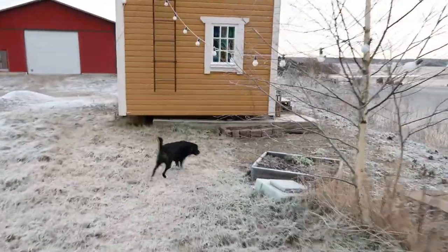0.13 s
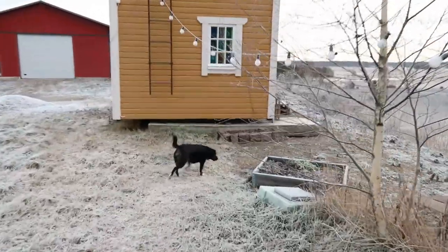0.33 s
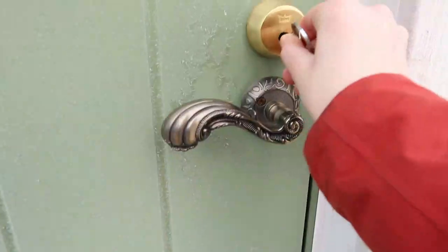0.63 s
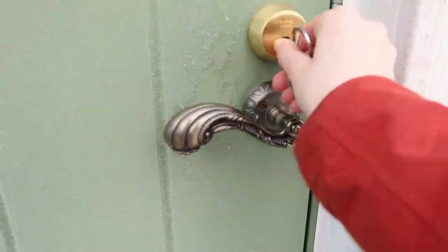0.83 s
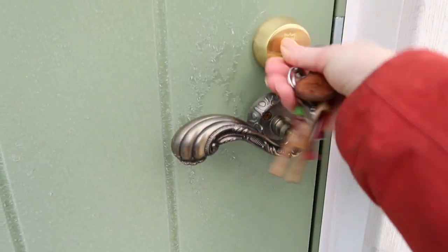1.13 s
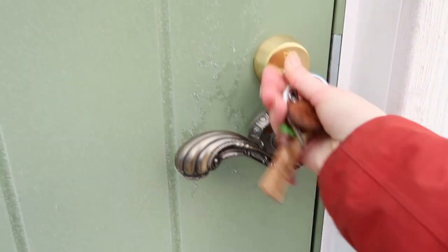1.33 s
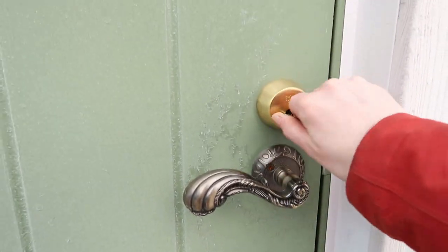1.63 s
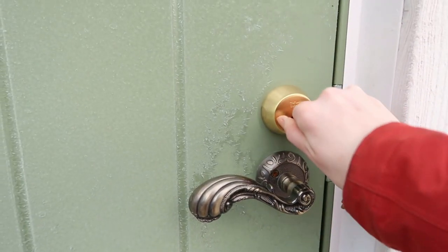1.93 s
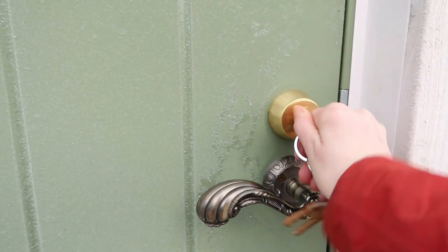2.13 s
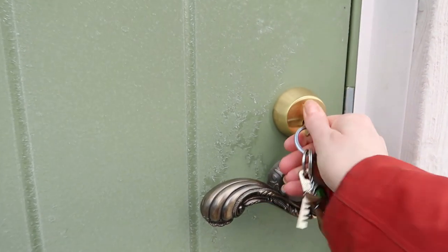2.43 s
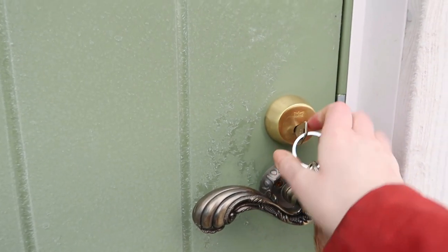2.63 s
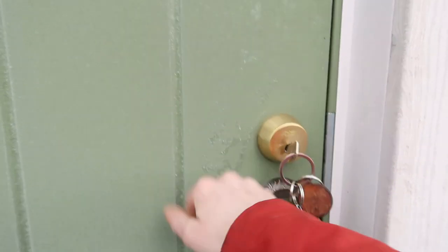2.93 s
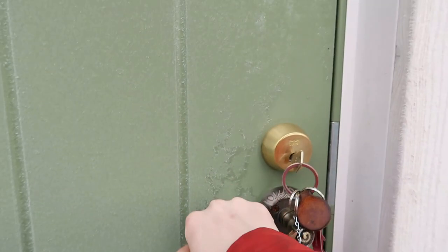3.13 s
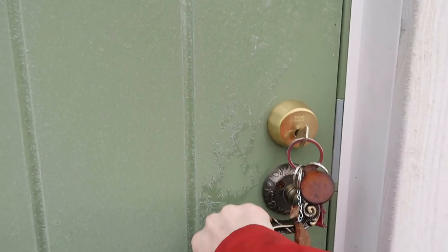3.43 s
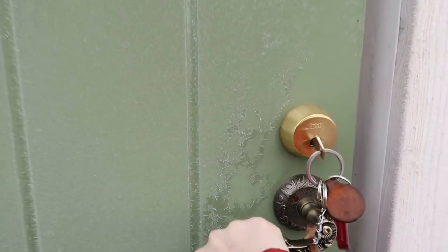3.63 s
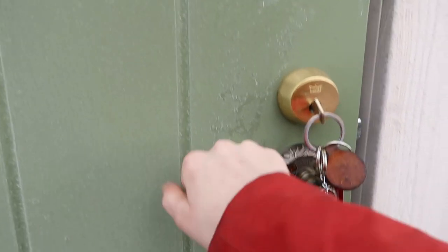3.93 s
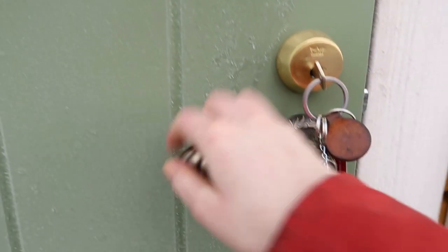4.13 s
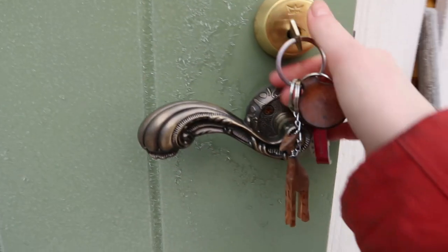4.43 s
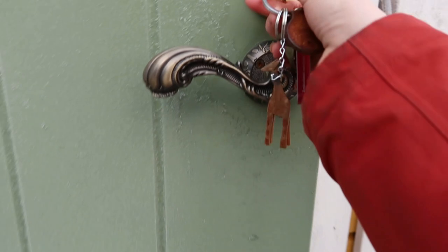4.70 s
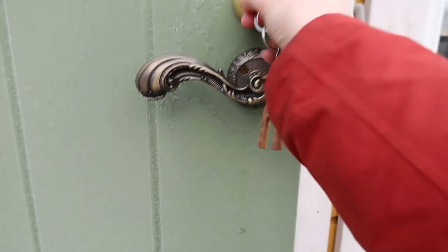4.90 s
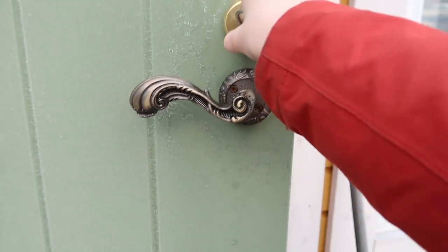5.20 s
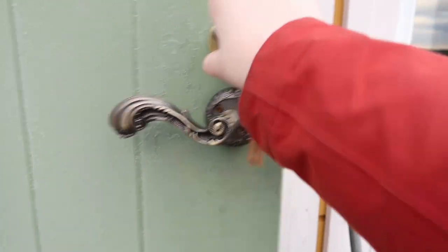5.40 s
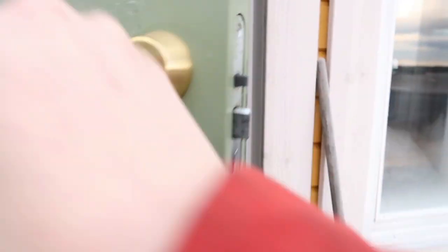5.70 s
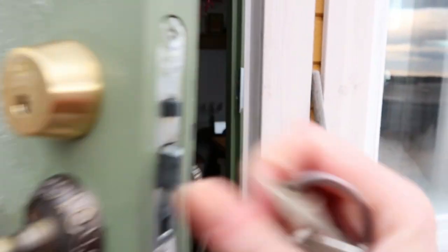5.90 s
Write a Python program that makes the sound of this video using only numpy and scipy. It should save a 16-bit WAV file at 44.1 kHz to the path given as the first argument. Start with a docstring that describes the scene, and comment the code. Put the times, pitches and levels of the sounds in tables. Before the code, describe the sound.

The sound is close, picked up by a hand-held microphone outdoors in still, faintly hissing air. A soft step lands at about 0.3 seconds. From 0.6 to 1.2 seconds a key clicks in a lock, with hollow knocks from the wooden door. Keys jingle lightly around 1.5 to 1.9 seconds, then the lock turns with sharp metal clacks between 2.1 and 2.3. A brighter jingle and more clicks come near 2.9. From 3.2 seconds the handle is pressed, and the door thuds and shudders, loudest around 3.6, with another sharp click at 3.9. Between 4.5 and 5 seconds the key turns again amid jingling, clicks and knocks. The door is pulled open with a thud and a latch clack from 5.5 to 5.7, and the keys give a small clink at 6. Soft sleeve rubbing and low handling rumble come and go throughout.

```python
"""A frosty morning outdoors, close to a hand-held camera. A step crunches, then a hand works a key in
the lock of a wooden door: metal contacts click and the key ring jingles. The hand presses the handle,
and the panel thuds and shudders. The key turns again and the door is pulled open. Throughout, sleeve
and parts rub, the grip rumbles and still air hisses, all heard through two close microphone ports."""
import sys
import numpy as np
from scipy.fft import rfft, irfft, next_fast_len
from scipy.io import wavfile
from scipy.ndimage import map_coordinates

SR = 44100
rng = np.random.default_rng(int(sys.argv[2]) if len(sys.argv) > 2 else 0)


def store_pcm(level_fs):
    """Save levels as 16-bit WAV."""
    pcm = np.round(np.clip(level_fs, -1, 1) * 32767).astype(np.int16)
    wavfile.write(sys.argv[1], SR, np.atleast_2d(pcm).T)


N = 267025

# Metal contacts in lock and handle: start_s, level_db, pitch_hz, brightness_db
LOCK_CLICKS = [(0.328, -30.5, 1320, -10.5), (0.591, -39, 1350, -28), (0.605, -27, 1830, -14.5),
               (0.84, -20.5, 1530, -8.5), (.849, -18, 1710, -13), (0.8973, -33, 2660, -7.5),
               (0.94, -23, 1520, -7), (0.9568, -26.5, 1850, -6), (1.174, -31, 1800, -26),
               (1.21, -27, 1470, -12), (1.584, -30, 5100, -22), (2.0533, -29, 1620, -26.5),
               (2.116, -28.5, 1670, -21), (2.135, -11, 1780, -17), (2.149, -9, 1860, -15),
               (2.188, -13.5, 1750, -20.5), (2.2048, -14, 1700, -25), (2.226, -26.5, 1790, -13.5),
               (2.2808, -23, 1740, -11), (2.297, -9, 1770, -9.5), (2.5914, -30, 1780, -17),
               (2.667, -29, 4800, -1.5), (2.725, -28.5, 3950, -10), (2.8, -21, 2620, -19),
               (2.842, -30, 2690, -12), (2.853, -22.5, 2500, -9), (2.9017, -11.5, 3800, -22),
               (2.9243, -11, 2840, -19), (3.0036, -27.5, 4800, -12.5), (3.2079, -12.5, 1780, -24),
               (3.3215, -17.5, 1930, -21), (3.491, -18.5, 1610, -13.5), (3.556, -19, 2070, -23),
               (3.601, -17.5, 1690, -25), (3.642, -16, 3020, 2.5), (3.8691, -10, 1950, -23),
               (4.024, -33, 1710, -11.5), (4.5455, -26.5, 2520, -22), (4.604, -22, 2550, -28),
               (4.6262, -22, 4470, -5), (4.6495, -21.5, 2550, -26), (4.887, -17.5, 2200, -11),
               (4.8917, -19, 2170, -13.5), (5.487, -31, 1910, -44), (5.66, -26, 1530, -14),
               (5.692, -8.5, 1460, -22), (5.831, -26.5, 1340, -18.5)]
# Lock case modes: freq_hz, width_hz, level_db
CASE_MODES = [(1298, 740, 12), (1805, 930, 12.5), (2115, 280, 14.5), (2520, 460, 13), (2960, 1600, 8.5),
              (4000, 940, -2.5), (4480, 390, -3), (5000, 1460, -5)]
# Modes of the cylinder's small steel parts: freq_hz, width_hz, level_db
PIN_MODES = [(5270, 830, -2), (6650, 140, 9), (7990, 450, -1.5)]
# Treble of a metal contact: freq_hz, density_db
CONTACT_SPECTRUM = [(3000, -0.5), (5500, 2.5), (9000, 0), (13000, -2), (14500, -27), (16000, -39)]
RATTLE_DB, SNAP_DB, RING_DB = -9.5, 2.5, -4.5
RATTLE_T60_S, SNAP_T60_S, RING_T60_S = 0.068, 0.033, 0.04828

def lock():
    """Each contact snaps in the pins, rattles the case and rings the modes near its pitch."""
    starts_s, levels_db, pitches_hz, bright_db = np.transpose(LOCK_CLICKS)
    mode_hz, _, mode_db = np.transpose(CASE_MODES)
    chatter = amp(1.4 * np.clip(wobble(490), -3, 1.5))  # parts bounce as they seat
    case_force = bursts(starts_s, levels_db + RATTLE_DB, RATTLE_T60_S, rise_s=0.0022)
    rattle = filtered(chatter * case_force, resonances(CASE_MODES))
    pin_force = bursts(starts_s, levels_db + bright_db + SNAP_DB, SNAP_T60_S, rise_s=0.0007)
    pins = lambda hz: colour(CONTACT_SPECTRUM)(hz) + 0.41 * resonances(PIN_MODES)(hz)
    snap = filtered(chatter * pin_force, pins)
    tones, t = np.zeros(N), np.arange(SR // 5) / SR
    detunes = rng.normal(1, .015, (len(starts_s), len(mode_hz)))
    for start_s, level_db, pitch_hz, detune in zip(starts_s, levels_db, pitches_hz, detunes):
        struck_db = mode_db + falloff_db(mode_hz, pitch_hz, db_per_octave=54)
        struck = ring(mode_hz * detune, struck_db, RING_T60_S, t, scatter_db=4)
        add_at(tones, start_s, amp(level_db + RING_DB) * struck * attack(t, 0.0014))
    roughness = unit_rms(1 + .5 * wobble(350))  # loose parts smear the ringing
    return rattle + roughness * tones + snap


# Door knocks and low thumps of handling or steps:
# start_s, level_db, pitch_hz, boom_re_level_db, hardness_db
THUDS = [(0.273, -28, 173, 7, -36), (0.431, -36.5, 172, 10.5, -11), (0.588, -26.5, 222, 1, 0.5),
         (.603, -18.5, 275, -1, -1.5), (.833, -16.5, 233, -2, -8.5), (.847, -10.5, 274, -6, -6.5),
         (.937, -14, 220, -4, -5), (.959, -17.5, 377, 0, -15.5), (1.448, -27, 183, 3.5, -11.5),
         (1.523, -41.5, 172, 17, 3), (1.57, -38, 172, 10.5, -2.5), (1.675, -31.5, 210, 6, -4.5),
         (2.052, -26, 323, -12, -10), (2.162, -30, 385, 7, 1), (2.296, -24.5, 334, -3.5, 6),
         (2.623, -30, 266, -14, -8), (2.804, -19, 546, -37, -12.5), (2.822, -24.5, 520, -27, -12),
         (2.853, -21.5, 541, -28, -34), (2.876, -28, 520, -31, -14), (2.903, -20, 538, -22, -8),
         (2.925, -21, 507, -20, -10), (3.158, -34, 400, -20, -6), (3.175, -17, 237, -10, -18),
         (3.213, -15.5, 232, -6, -19), (3.47, -23.5, 279, -6, -16), (3.492, -15.5, 392, -33, -12),
         (3.567, -8, 313, -0.5, -17), (3.602, -9, 334, -9, -15), (3.619, -10, 467, -17, -7.5),
         (3.632, -12, 430, -3.5, -10.5), (3.772, -19.5, 172, -0.5, -34), (3.807, -27.5, 174, -5, -20),
         (3.868, -26.5, 440, -1.5, 1.5), (4.027, -23.5, 273, -13.5, -17), (4.189, -29, 366, -15, -24),
         (4.602, -19.5, 337, -5.5, -42), (4.636, -15.5, 395, -12.5, -17), (4.668, -23, 426, -12, -16),
         (4.698, -24, 415, -12, -27), (4.747, -30, 404, -6, -19), (4.792, -25, 430, -34, -34),
         (4.891, -26, 500, -32, -0.5), (5.455, -29.5, 295, -36, -39), (5.486, -18, 266, -28, -20),
         (5.493, -11, 261, -27, -22.5), (5.54, -21, 248, -18.5, -49), (5.66, -23.5, 396, 0, 4),
         (5.675, -15.5, 280, -6, -4.5), (5.692, -20, 276, -11.5, -5), (5.735, -22.5, 414, -1, -32)]
# Panel modes: freq_hz, width_hz, level_db
PANEL_MODES = [(201.7, 17.4, -5), (254.6, 17, -2.5), (313.6, 30, 1), (369.8, 50, 1), (426.7, 68, -1),
               (507.8, 76, -2)]
# Modes of the whole leaf: freq_hz, level_db
LEAF_MODES = [(66, 1.5), (120, 3)]
# Stile modes: freq_hz, width_hz, level_db
STILE_MODES = [(588, 154, 8), (752, 126, 12), (993, 73, 11), (1236, 55, 6), (1554, 330, -1.5)]
SOFT_PANEL_T60_S, LEAF_T60_S, STILE_T60_S = 0.17, 0.23, 0.13

def thuds():
    """Door knocks and thumps of handling or steps share the door's modes; hard ones are shorter."""
    tones, t = np.zeros(N), np.arange(SR // 2) / SR
    panel_hz, _, panel_db = np.transpose(PANEL_MODES)
    leaf_hz, leaf_db = np.transpose(LEAF_MODES)
    stile_hz, _, stile_db = np.transpose(STILE_MODES)
    for start_s, level_db, pitch_hz, boom_db, hard_db in THUDS:
        softness = np.clip(1 - 0.01 * (hard_db + 33), .75, 1)
        struck_db = panel_db + falloff_db(panel_hz, pitch_hz, db_per_octave=25.8)
        panel = ring(panel_hz, struck_db, SOFT_PANEL_T60_S * softness, t, scatter_db=5)
        panel *= attack(t, 0.002 * softness ** 2)
        leaf = ring(leaf_hz, leaf_db, LEAF_T60_S, t, scatter_db=5) * attack(t, 0.0004)
        detune = rng.normal(1, .03, len(stile_hz))
        stile = ring(stile_hz * detune, stile_db, STILE_T60_S, t, scatter_db=4) * attack(t, 0.002)
        thud = panel + amp(boom_db) * leaf + amp(hard_db - 4.5) * stile
        add_at(tones, start_s, amp(level_db) * thud)
    starts_s, levels_db, *_, hardness_db = np.transpose(THUDS)
    rattle_force = bursts(starts_s, levels_db + hardness_db - 0.5, STILE_T60_S, rise_s=0.0019)
    return tones + filtered(rattle_force, resonances(STILE_MODES))


# Keys touching each other: start_s, level_db, place_in_bunch (0-1), tick_db
KEY_TOUCHES = [(0.601, -27, 0.82, -22), (1.5045, -44, 1, -1), (1.529, -32.5, .9, 5), (1.584, -39, .9, -14),
               (1.62, -35, 0.9, -7), (1.779, -35, 1, 0.5), (1.808, -32, 1, -16), (1.827, -18.5, 1, -27),
               (1.861, -44, 0.8, 9), (2.563, -29.5, 0.97, -24), (2.681, -24.5, 0.88, -10),
               (2.8, -15.5, 0.3, -15), (2.903, -13, 0.14, -21), (2.919, -7.5, 0.08, -28),
               (3.005, -29, .1, -9), (3.347, -38.5, .5, 16.5), (4.557, -26.5, 0.93, -5),
               (4.587, -34, .3, -12), (4.605, -20, 0.25, -21), (4.632, -14.5, 0.44, -20),
               (4.65, -21.5, 0.3, -16), (4.703, -25.5, 0.8, -9), (4.798, -26.5, 0.87, -11),
               (4.798, -24.5, 0.32, -16), (4.962, -23, 0.7, -3), (5.035, -24.5, 0.85, -16),
               (5.998, -25.5, 0.5, -3.5), (6.017, -34.5, 0.96, -1)]
# Key modes: freq_hz, level_db, free_t60_s, place_in_bunch (0-1)
KEY_MODES = [(7900, -3, .07, 0), (11350, 0, .06, 0), (14220, -5, .04, 0), (15410, -3, .1, 0),
             (6270, -8, .025, .1), (3900, -3, .025, .15), (5800, -8, .03, .15), (2570, 0, .04, .3),
             (2980, -9, .03, .3), (4440, -5, .035, .3), (7960, 0, .045, .5), (9850, -12, .03, .5),
             (11900, -2, .03, .5), (12800, -2, .03, .65), (13750, -3, .03, .75), (4800, -10, .03, .9),
             (5260, -7, .045, 1), (11950, 0, .05, 1)]
BUNCH_LOSS_DB, MUFFLE_BELOW_DB, MUFFLE_PER_DB = 80, -20, .03
LINK_DB, LINK_T60_S, TICK_T60_S = -5, .022, 0.011
SETTLE_MEAN_S, SETTLE_MEAN_DB = .015, -17

def keys():
    """A touch ticks and rings nearby keys and chain links; the bunch settles with two lighter touches."""
    tones, t = np.zeros(N), np.arange(SR // 6) / SR
    mode_hz, mode_db, free_t60_s, mode_place = np.transpose(KEY_MODES)
    for start_s, level_db, place, _ in KEY_TOUCHES:
        struck_db = mode_db - BUNCH_LOSS_DB * np.abs(mode_place - place)
        # Light touches stay in contact and ring less long.
        t60_s = free_t60_s[:, None] * np.clip(1 + MUFFLE_PER_DB * (level_db - MUFFLE_BELOW_DB), .4, 1)
        settling = [(rng.exponential(SETTLE_MEAN_S), rng.normal(SETTLE_MEAN_DB, 3)) for _ in range(2)]
        for delay_s, lighter_db in [(0, 0)] + settling:
            link_hz = np.exp(rng.uniform(np.log(2200), np.log(14500), 12))
            links = ring(link_hz, np.zeros(12), LINK_T60_S, t, scatter_db=4)
            detune = rng.normal(1, .002, len(mode_hz))
            struck = ring(mode_hz * detune, struck_db, t60_s, t, scatter_db=3)
            jingle = (struck + amp(LINK_DB) * links) * attack(t, 0.0013)
            add_at(tones, start_s + delay_s, amp(level_db + lighter_db) * jingle)
    starts_s, levels_db, _, tick_db = np.transpose(KEY_TOUCHES)
    tick_force = bursts(starts_s, levels_db + tick_db - 4.5, TICK_T60_S, rise_s=0.00082)
    ticks = filtered(tick_force, lambda hz: colour(CONTACT_SPECTRUM)(hz) * hz / 4000)
    roughness = unit_rms(1 + .55 * wobble(300))
    return roughness * tones + ticks


# Sliding strokes: peak_s, half_length_s, rasp_db, stile_re_rasp_db, fizz_re_rasp_db
STROKES = [(0.333, 0.06, -44, 6.5, -19), (0.47, 0.065, -47, -34, -15), (1.219, 0.062, -44.5, 15, -14),
           (1.288, 0.04, -43, 0, -8), (2.209, 0.042, -31.5, 2, -15), (2.863, 0.028, -41, -28, -4),
           (3.21, 0.023, -32, -2.5, -6.5), (3.342, 0.055, -31.5, -3, -17), (3.556, 0.042, -35.5, -1, -29),
           (3.651, 0.03, -25, -9, -2), (4.314, 0.036, -56.5, -40, 6.5), (4.56, 0.024, -41, -24, -7),
           (4.631, 0.056, -41, 7.5, -1), (4.967, 0.014, -50, 5, 11.5), (5.01, 0.08, -43, 3.5, -7.5),
           (5.215, 0.13, -72.5, 27.5, -37), (5.806, 0.074, -39.5, 1, -16)]
# Steady handling by sleeve, fingers and feet: time_s, rub_db, shudder_db, rumble_db
HANDLING = [(0, -48.5, -52, -74), (.3, -51, -42.5, -32.5), (.55, -55, -75, -51.5), (.95, -78, -46.5, -52),
            (1.4, -54, -46.5, -42.5), (1.85, -57, -49.5, -44), (1.97, -64, -69, -57),
            (2.248, -44.5, -35, -35), (2.5, -56, -65, -59), (2.699, -50.5, -45.5, -55.5),
            (3.44, -52.5, -40, -43.5), (3.603, -28.5, -21, -16.5), (3.75, -57.5, -43, -27.5),
            (4.05, -50, -48, -50), (4.5, -52.5, -65, -55), (4.75, -46.5, -41, -55),
            (5.4, -59.5, -51.5, -53.5), (6.05, -54, -54, -54)]
# Friction rasp: freq_hz, density_db
RASP_SPECTRUM = [(300, 9), (600, 5), (1100, 6), (1700, 6), (2600, 1), (3500, -1.5), (4500, -5),
                 (6500, -14.5), (12000, -57)]
# Friction fizz: freq_hz, density_db
FIZZ_SPECTRUM = [(3000, -12), (5000, -7), (8000, -6.5), (12500, -4), (14500, -19), (16000, -57)]
# Sleeve rustle bands: centre_hz
SLEEVE_BANDS_HZ = [1550, 2100]

def rubbing():
    """Sliding strokes rasp in lumps, the sleeve swishes smoothly, and both fizz and shake the door."""
    t = np.arange(N) / SR
    rub_gain, shudder_gain, _ = amp(curves(HANDLING))
    gains = rub_gain * amp([[-9], [-10], [-20]])  # rasp, stile, fizz
    for peak_s, half_s, rasp_db, stile_db, fizz_db in STROKES:
        swell_db = rasp_db - 20 * ((t - peak_s) / half_s) ** 2
        gains += amp(swell_db) * amp([[0], [stile_db], [fizz_db]])
    rasp_gain, stile_gain, fizz_gain = gains
    rattle = stile_gain * gritty(resonances(STILE_MODES), rate_hz=80, depth_db=3)
    sleeve = sum(gritty(resonances([(hz, 350, 0)]), rate_hz=8, depth_db=5) for hz in SLEEVE_BANDS_HZ)
    swish = rub_gain * (gritty(colour(RASP_SPECTRUM), rate_hz=30, depth_db=1.5) + .25 * sleeve)
    rasp = rasp_gain * gritty(colour(RASP_SPECTRUM), rate_hz=120, depth_db=3.5)
    fizz = fizz_gain * gritty(colour(FIZZ_SPECTRUM), rate_hz=340, depth_db=4.5)
    heavy_panel = lambda hz: resonances(PANEL_MODES)(hz) / (1 + 1j * hz / 900) ** 2  # loses treble
    shudder = shudder_gain * gritty(heavy_panel, rate_hz=40, depth_db=3.5)
    return rasp + swish + rattle + fizz + shudder


# Camera body rumble: freq_hz, density_db
RUMBLE_SPECTRUM = [(20, -11), (60, -1), (86, 2.5), (178, -5), (250, -17.5), (320, -53), (550, -120)]
# Side of the rumble: time_s, left_minus_right_db
GRIP_BALANCE = [(.4, 4), (1.0, 4), (1.6, -8), (2.1, 0)]

def grip():
    """The grip rumbles through the camera body, stronger at the nearer port."""
    *_, rumble_db = curves(HANDLING)
    side_db, = curves(GRIP_BALANCE)
    rumble = colour(RUMBLE_SPECTRUM)
    mid = gritty(rumble, rate_hz=25.04, depth_db=0.5)
    side = .3 * gritty(lambda hz: rumble(hz) * hz ** 2, rate_hz=25, depth_db=1.5)
    return amp(rumble_db) * np.array([mid + side, mid - side]) * amp([side_db / 2, -side_db / 2])


# Outdoor air and microphone hiss: freq_hz, density_db
AIR_SPECTRUM = [(25, -26), (92, 4.5), (218, 2), (381, 4.5), (518, -1), (3770, -17.5), (7900, -24),
                (11000, -33.5), (14300, -68), (22000, -120)]
AIR_DB, CODER_TONE_HZ, CODER_TONE_DB = -50.5, 13000, -84

def noise_floor():
    mid, side = filtered(rng.standard_normal((2, N)), colour(AIR_SPECTRUM))
    side = filtered(side, lambda hz: hz / (hz + 900))
    flicker = amp(CODER_TONE_DB + 3 * wobble(45))
    coder_tone = flicker * np.sin(2 * np.pi * CODER_TONE_HZ * np.arange(N) / SR + wobble(40))
    return amp(AIR_DB + 2.56 * wobble(2.58)) * np.array([mid + side, mid - side]) + coder_tone


# Phase lead of the left port: freq_hz, lead_rad
PORT_LEAD = [(25, 0), (3800, 0), (5600, -.6), (7500, -1.9), (10600, -2.2), (15000, -2.3)]
# Sound that differs between the ports: freq_hz, level_db
PORT_SCATTER = [(30, -28), (70, -18), (150, -8), (350, -18), (700, -21), (1500, -13), (3000, -9),
                (8000, -10)]

def ports(x):
    """Two ports: a phase offset grows with pitch; a randomly fluttering difference widens the sound."""
    direct = filtered(x, lambda hz: np.exp(.5j * log_interp(PORT_LEAD, hz) * np.array([[1], [-1]])))
    scattered = wobble(16) * filtered(x, lambda hz: 1j * amp(log_interp(PORT_SCATTER, hz)))
    return direct * amp([[.2], [-.2]]) + np.array([scattered, -scattered])


def ring(hz, db, t60_s, t, scatter_db):
    """Modes struck together at random strengths and polarities, peak 1."""
    polarity, strength = rng.standard_normal((2, len(hz), 1))
    envelopes = amp(db[:, None] + scatter_db * strength - 60 * t / t60_s)
    tone = (np.sign(polarity) * envelopes * np.sin(2 * np.pi * hz[:, None] * t)).sum(0)
    return tone / np.abs(tone).max()


def bursts(starts_s, levels_db, t60_s, rise_s):
    """Force of rattling contacts: one dying noise burst each."""
    force, t = np.zeros(N), np.arange(SR // 4) / SR
    envelope = amp(-60 * t / t60_s) * attack(t, rise_s)
    for start_s, level_db in zip(starts_s, levels_db):
        add_at(force, start_s, amp(level_db) * envelope * rng.standard_normal(len(t)))
    return force


def gritty(response, rate_hz, depth_db):
    """Noise in uneven lumps through a response, RMS 1."""
    lumps = amp(depth_db * np.clip(wobble(rate_hz), -3, 1.8))
    return unit_rms(filtered(lumps * rng.standard_normal(N), response))


def resonances(modes):
    """Causal response of modes of alternating polarity, unit power gain."""
    return lambda hz: unit_rms(sum(
        (-1) ** k * amp(db) * 1j * hz * width_hz / (mode_hz ** 2 - hz ** 2 + 1j * hz * width_hz)
        for k, (mode_hz, width_hz, db) in enumerate(modes)))


def colour(spectrum):
    """Zero-phase response, unit power gain."""
    return lambda hz: unit_rms(amp(log_interp(spectrum, hz)))


def filtered(x, response):
    size = next_fast_len(N + SR // 2)
    return irfft(rfft(x, size) * response(np.fft.rfftfreq(size, 1 / SR)), size)[..., :N]


def wobble(rate_hz):
    """Smooth random curve."""
    knots = rng.standard_normal(int(N * rate_hz / SR) + 4)
    return map_coordinates(knots, [np.arange(N) * rate_hz / SR])


def curves(table):
    """Columns of a timed table, interpolated per sample."""
    times_s, *columns = np.transpose(table)
    return [np.interp(np.arange(N) / SR, times_s, column) for column in columns]


def log_interp(points, hz):
    point_hz, values = np.transpose(points)
    return np.interp(np.log(hz + 1), np.log(point_hz + 1), values)


def falloff_db(hz, pitch_hz, db_per_octave):
    return -db_per_octave * np.abs(np.log2(hz / pitch_hz))


def attack(t, rise_s):
    return 1 - np.exp(-t / rise_s)


def add_at(track, start_s, sound):
    span = track[round(start_s * SR):][:len(sound)]
    span += sound[:len(span)]


def amp(db):
    return 10 ** (np.asarray(db) / 20)


def unit_rms(x):
    return x / np.sqrt(np.mean(np.abs(x) ** 2) + 1e-20)


def scene():
    return ports(rubbing() + lock() + thuds() + keys()) + grip() + noise_floor()


BAND_LIMIT_HZ = 16134

def record(dry):
    """The camera keeps nothing above its band limit."""
    return filtered(dry, lambda hz: hz < BAND_LIMIT_HZ)


dry = scene()
out = record(dry)
store_pcm(out)
```